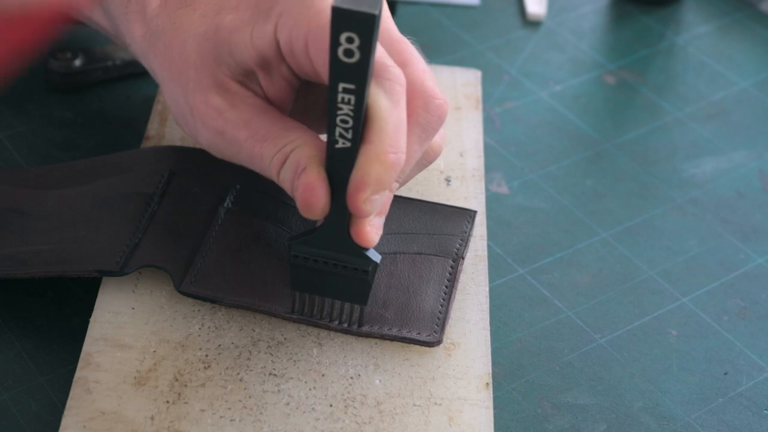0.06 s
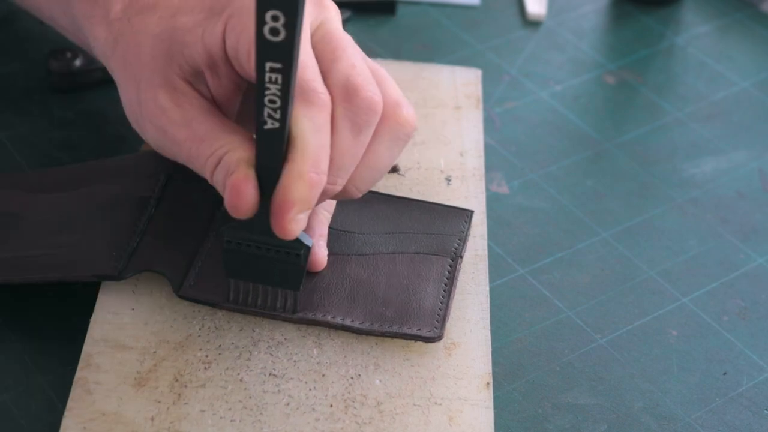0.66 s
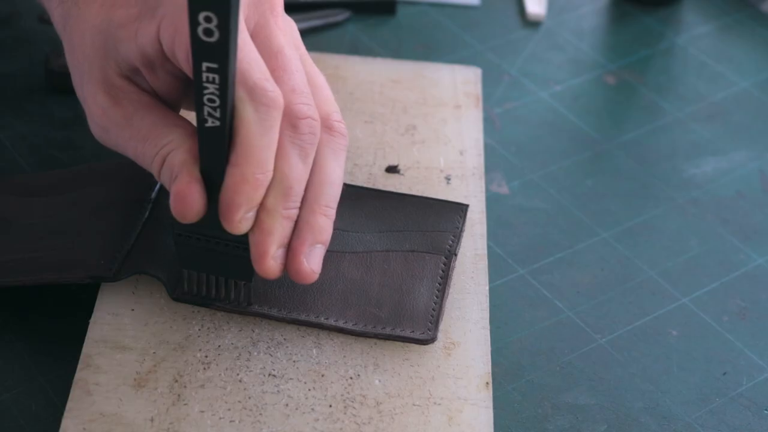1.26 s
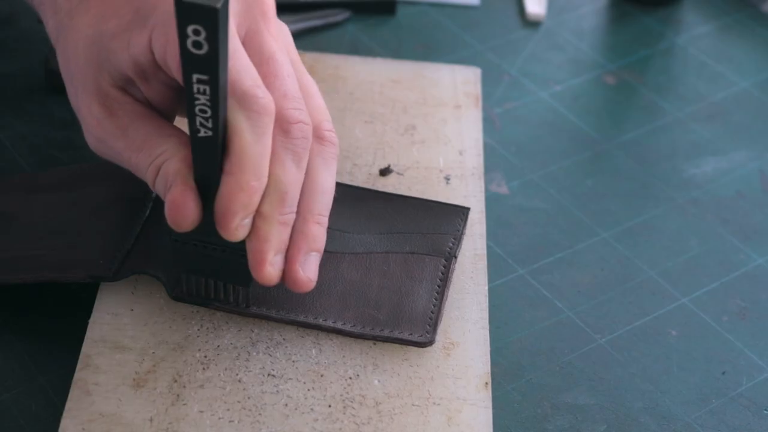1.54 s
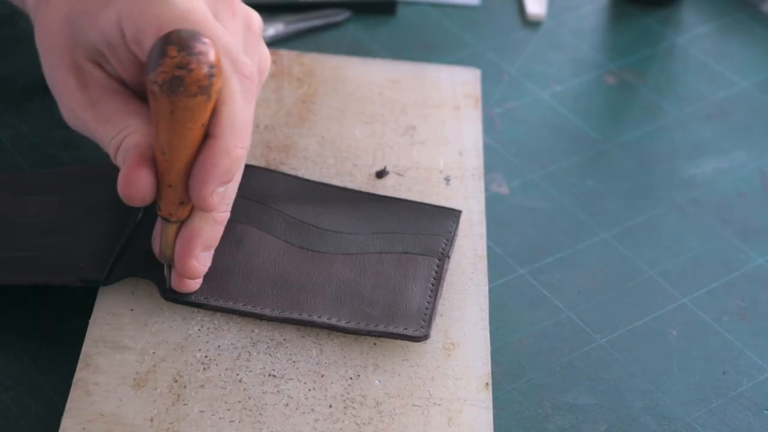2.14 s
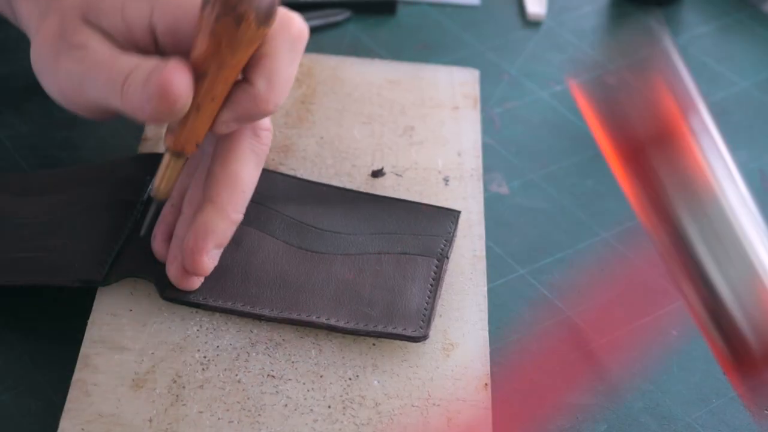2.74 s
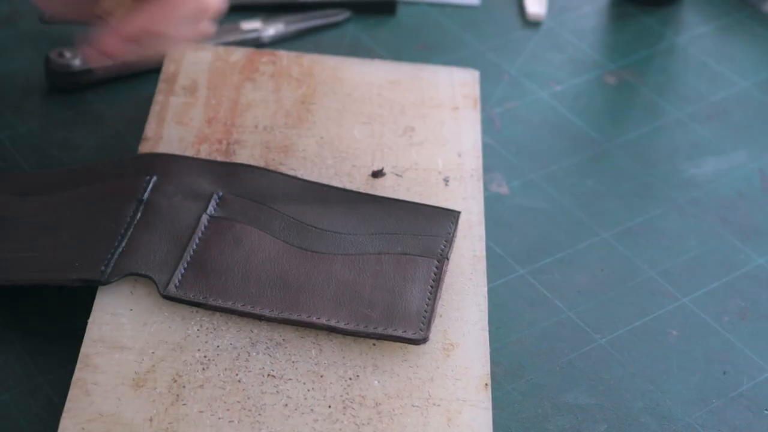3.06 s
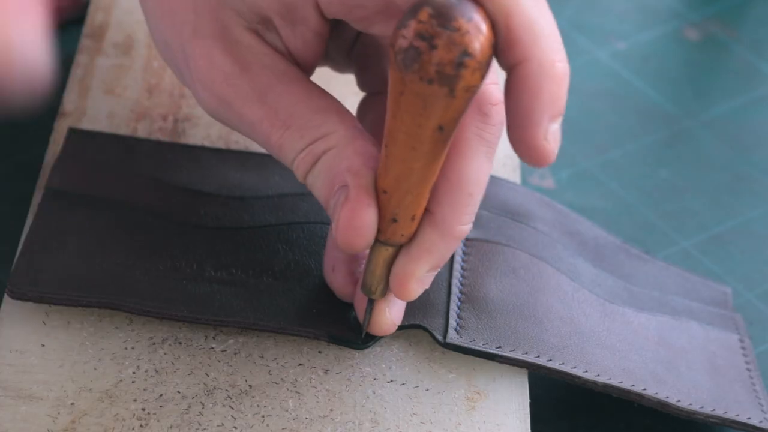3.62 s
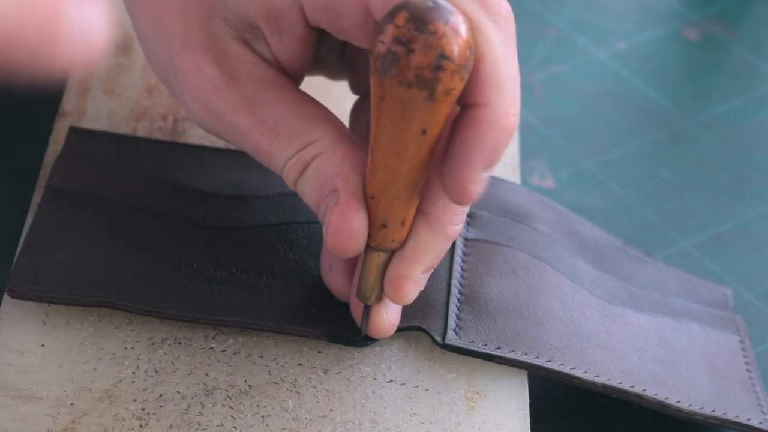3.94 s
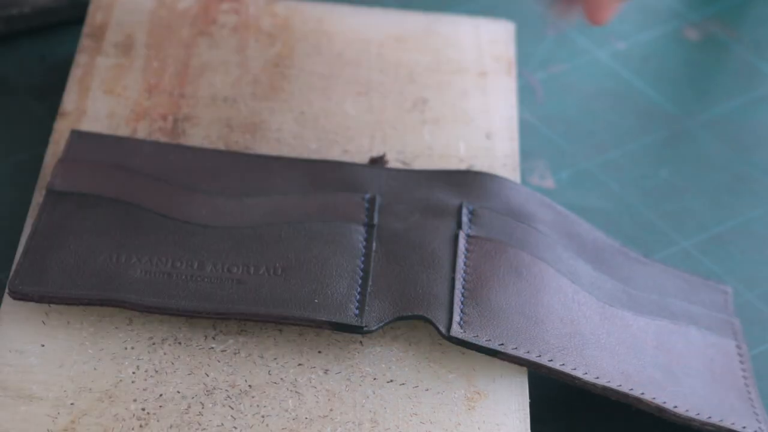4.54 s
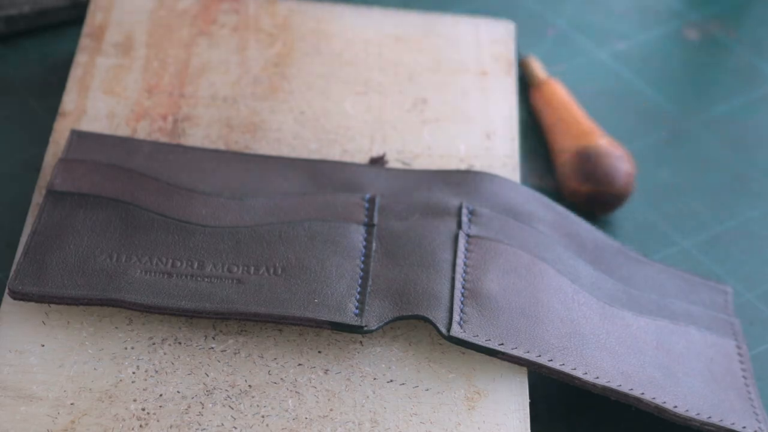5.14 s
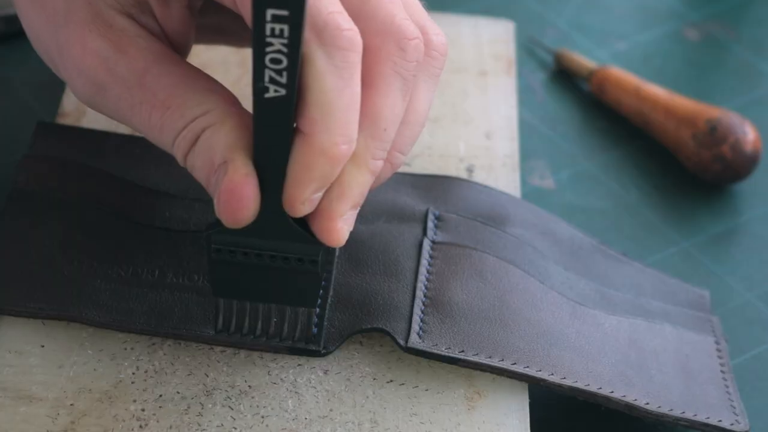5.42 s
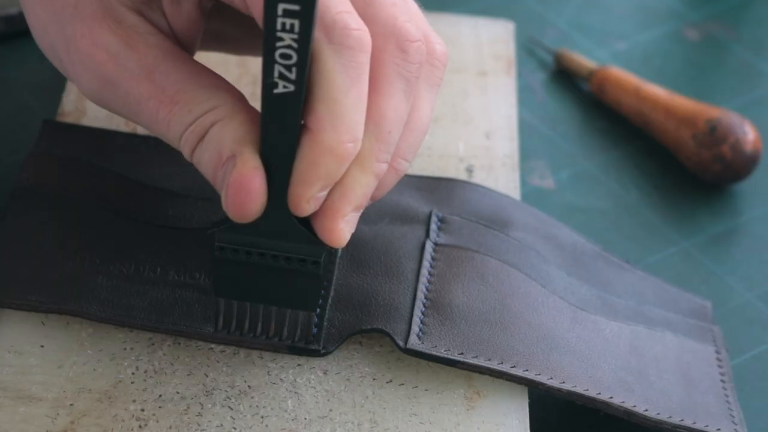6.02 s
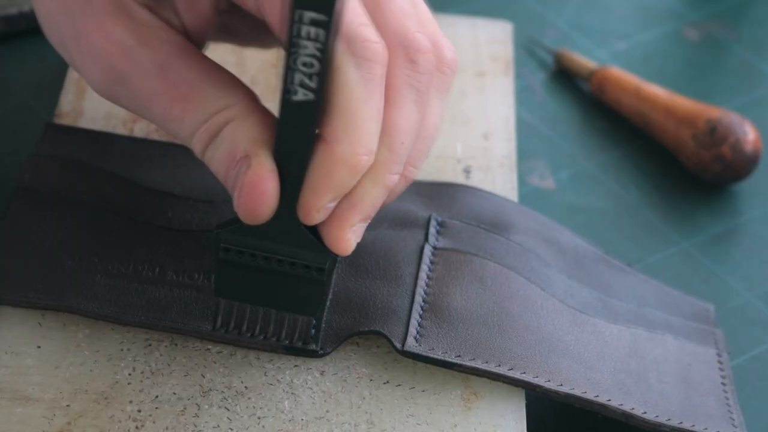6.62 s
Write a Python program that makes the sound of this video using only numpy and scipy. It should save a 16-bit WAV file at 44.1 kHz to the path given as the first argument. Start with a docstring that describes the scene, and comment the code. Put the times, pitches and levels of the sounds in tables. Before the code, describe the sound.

Close, hard mallet knocks on a stitching chisel and a wooden-handled awl, spaced by pauses and the lighter clatter of tools being put down.

```python
"""Sharp mallet blows on steel ring out in a small, lively workshop: a stitching chisel, then a
wooden-handled awl, is driven through a leather wallet into a cutting board. Between blows the mallet and
the awl are put down, the wallet slides and the next tool is seated, over quiet air and hum. Each contact
cracks, rings the tool and thumps the bench. The close microphone overloads on the heavy blows."""
import sys
import numpy as np
from scipy import signal
from scipy.fft import rfft, irfft
from scipy.io import wavfile

SR = 44100
rng = np.random.default_rng(int(sys.argv[2]) if len(sys.argv) > 2 else 0)


def digitize_waveform(pressure):
    """Quantize a signal to 16-bit integers and store it at the path in sys.argv[1].

    Rows of a 2-D input are taken as channels; values are limited to [-1, 1].
    """
    field = np.atleast_2d(pressure).T
    bounded = np.clip(field, -1, 1)
    quanta = np.round(bounded * 32767).astype(np.int16)
    wavfile.write(sys.argv[1], SR, quanta)


N = 303408
EDGE_HZ = 15800
KNOCK_SAMPLES = 32768  # one knock with its tail
T = np.arange(KNOCK_SAMPLES) / SR
HZ = np.fft.rfftfreq(KNOCK_SAMPLES, 1 / SR)


def amp(db):
    """Decibels to gain."""
    return 10 ** (np.asarray(db) / 20)


def unit(x):
    """Scales to an energy of one."""
    return x / np.sqrt(np.sum(x ** 2) + 1e-20)


def curve(points, hz):
    """An EQ curve through the points, on a log-frequency axis."""
    point_hz, db = np.transpose(points)
    return np.interp(np.log(hz + 1), np.log(point_hz + 1), db)


def decay(t, t60):
    """An envelope that falls 60 dB in t60 seconds."""
    return np.exp(-np.log(1000) * t / np.maximum(t60, 1e-3))


def add(mix, start_s, sound):
    """Lays a sound into the mix, trimming what falls outside."""
    start = round(start_s * SR)
    sound = sound[max(-start, 0):]
    part = mix[max(start, 0):][:len(sound)]
    part += sound[:len(part)]


def impulse(gain_db):
    """The sharpest click that has this spectrum (minimum phase)."""
    log_gain = np.log(amp(np.r_[gain_db, gain_db[-2:0:-1]]))
    return irfft(np.exp(np.conj(signal.hilbert(log_gain)))[:len(HZ)])


def through(x, response):
    """Passes a knock through an impulse response."""
    return signal.fftconvolve(x, response)[:KNOCK_SAMPLES]


def noise(colour):
    """Steady noise of rms one, shaped by an EQ curve."""
    hz = np.fft.rfftfreq(N, 1 / SR)
    spectrum = rfft(rng.standard_normal(N)) * amp(curve(colour, hz))
    return np.sqrt(N) * unit(irfft(spectrum, N))


def room_tone(air_db, waver):
    """Quiet air with a slightly wavering hum and a faint whine; the mids swell once."""
    # Colour of the room air: freq_hz, gain_db
    air_colour = [(20, -11), (45, -13.5), (75, -20), (110, -12.5), (160, -6.5), (260, -18.5), (600, -16.5),
                  (1100, -29), (1800, -27), (3000, -30.5), (7000, -35), (15500, -34.5), (17000, -61.5)]
    # Tones of the hum and whine: pitch_hz, level_db
    hum_tones = [(49.3, -54.5), (150.7, -64.5), (468, -74), (5179, -85.5)]
    t = np.arange(N) / SR
    swell_db = 8 * np.exp(-((t - 5.2) / .8) ** 2)  # crests at 5.2 s
    mids = noise([(200, -21.5), (450, -4.0), (1100, 2.5), (1700, -17), (4000, -30.5), (16000, -48)])
    out = amp(air_db) * noise(air_colour) + amp(-63.5 + swell_db) * mids
    for hz, db in hum_tones:
        drift = np.interp(t, np.linspace(0, t[-1], 30), rng.standard_normal(30))
        out += amp(db) * np.sqrt(2) * np.sin(2 * np.pi * hz * t + waver * np.sqrt(hz) * drift)
    return out


def room_reverb(wet_db, t60_s=0.38, absorbed_hz=10300):
    """Dull early echoes, standing waves and a diffuse tail whose treble is absorbed first."""
    # Colour of the diffuse tail: freq_hz, gain_db
    tail_colour = [(60, -11.5), (250, 2.5), (1000, -4.5), (3000, -7), (15000, -9.5)]
    # Early reflections: delay_s, gain
    echoes = [(.0031, 0.17), (.0052, -.15), (0.0122, .15), (0.0147, .18)]
    # Standing waves of the room: pitch_hz, gain_db, t60_s
    standing_waves = [(97.9, 7.5, 0.68), (125.5, 6, 0.51), (160, 9.5, 0.5), (226.2, 5.5, 0.42),
                      (275.3, -0.5, 0.58), (293, -4, .4), (400, -12, 0.27)]
    band_hz, t, bands = signal.stft(rng.standard_normal(KNOCK_SAMPLES), SR, nperseg=256)
    band_t60 = t60_s / np.hypot(1, band_hz / absorbed_hz)[:, None]
    bands = bands * decay(t, band_t60) * amp(curve(tail_colour, band_hz))[:, None]
    bands *= np.sqrt(2 * np.log(1000) / (t60_s * SR))  # keeps the energy independent of t60_s
    fade_in = 1 - np.exp(-(T / 0.011) ** 2)
    response = signal.istft(bands, SR, nperseg=256)[1][:KNOCK_SAMPLES] * fade_in
    for delay_s, gain in echoes:
        add(response, delay_s, gain * signal.windows.hann(11) / 5)
    for hz, db, t60 in standing_waves:
        envelope = decay(T, t60)
        response += amp(db) * 2 * envelope / envelope.sum() * np.cos(2 * np.pi * hz * T)
    return amp(wet_db) * response


def bench_thud():
    """Low modes of alternating polarity; each builds over its first cycle, so the bass arrives last."""
    # Resonances of the bench: pitch_hz, level_db, t60_s
    modes = [(52.5, -13.5, 0.048), (101.54, -14.5, 0.53), (138, -8.5, 0.061), (189.3, -9, 0.052)]
    thud = np.zeros(KNOCK_SAMPLES)
    for k, (hz, db, t60) in enumerate(modes):
        attack = 1 - np.exp(-2 * hz * T)
        thud += (-1) ** k * amp(db) * unit(np.sin(2 * np.pi * hz * T) * decay(T, t60) * attack)
    return thud


def timbre(crack, modes, ring_db):
    """Spectrum of a struck object in dB: a broad crack plus resonances, narrower the longer they ring."""
    power = unit(amp(curve(crack, HZ))) ** 2
    for hz, db, t60 in modes:
        width_hz = 2.2 / max(t60, 1e-3)
        peak = HZ / np.hypot(HZ ** 2 - hz ** 2, HZ * width_hz) / np.hypot(1, HZ / (2 * hz))
        power += (amp(db + ring_db) * unit(peak)) ** 2
    return 10 * np.log10(power)


def knocks(contacts, modes, crack, ring_db, rattle_db, rattle_t60, wet_db, clack_hz=3000):
    """Each contact cracks, rings and thumps the bench; loose things rattle and the room answers."""
    out = np.zeros(N)
    body_db, bench = timbre(crack, modes, ring_db), bench_thud()
    octaves = np.log2(np.clip(HZ, 200, EDGE_HZ) / clack_hz)
    clack_band = np.exp(-(octaves / 0.39) ** 2)  # the band that the way of hitting brings out
    for start_s, level_db, tilt, thud_db, clack_db in contacts:  # tilt: brightness in dB per octave
        strike = unit(impulse(body_db + tilt * octaves + clack_db * clack_band))
        blow = strike + amp(thud_db) * bench
        rattle = unit(through(strike, rng.standard_normal(KNOCK_SAMPLES) * decay(T, rattle_t60)))
        sound = blow + amp(rattle_db) * rattle + through(blow, room_reverb(wet_db))
        add(out, start_s, amp(level_db) * np.sqrt(SR / 100) * sound)  # level as if spread over 10 ms
    return out


def leather_slides():
    """Soft swells of friction as the wallet is shifted on the board."""
    # Moves of the wallet: start_s, length_s, level_db
    slides = [(1.3, 0.14, -55.5), (4.333, 0.11, -61.5), (5.045, 0.27, -55.5)]
    # Colour of rubbing leather: freq_hz, gain_db
    friction_colour = [(300, 3.5), (2500, -13), (4600, -6), (6500, -20), (15000, -27.5)]
    pressure = np.zeros(N)
    for start_s, length_s, db in slides:
        add(pressure, start_s, amp(db) * np.hanning(int(length_s * SR)))
    return pressure * noise(friction_colour)


def prong_ticks():
    """Steel prongs catch on the leather or pull free; the stronger the tick, the brighter."""
    # Ticks in the stitch holes: start_s, level_db, clack_db
    ticks = [(1.1927, -54, 22.5), (4.2056, -52, -0.5), (4.2122, -46.5, -1), (5.2207, -44.5, 0),
             (5.2367, -39.5, 1.5)]
    # Resonances of the prongs: pitch_hz, level_db, t60_s
    modes = [(3925, -0.5, .006), (6074, 0.5, .006)]
    # Colour of the tick's attack: freq_hz, gain_db
    crack = [(200, -11), (1500, -4), (3500, -1.5), (6000, -4), (8500, -10), (12000, 2), (16000, -18.5)]
    typical_db, typical_tilt, tilt_per_db, thud_db = -45.5, -4.5, 0.45, -13.5
    contacts = [(s, db, typical_tilt + tilt_per_db * (db - typical_db), thud_db, clack_db)
                for s, db, clack_db in ticks]
    return knocks(contacts, modes, crack, ring_db=-5.5, rattle_db=-0.5, rattle_t60=0.06,
                  wet_db=-7, clack_hz=2742)


def tool_seatings():
    """A tool bumps the board through the leather, then settles with a softer, duller bump."""
    # Tools set on the leather: start_s, level_db, tilt_db_per_octave, thud_db
    seatings = [(0.344, -37, -4.5, -2), (1.10, -43.5, -5.5, -6), (3.5235, -35, 2, 0.5),
                (5.2888, -20.5, 0.2, -6.5)]
    # Resonances of the cutting board: pitch_hz, level_db, t60_s
    modes = [(209, -2, 0.16), (275, -2, 0.14), (820, -13, 0.033), (990, -15, 0.034), (1976, -25, 0.015)]
    # Colour of the bump's attack: freq_hz, gain_db
    crack = [(60, 0), (250, 7), (500, -7.5), (1000, -0.5), (2000, -8), (4000, -19.5), (7000, -32.5),
             (15000, -34)]
    settle_s, clack_db = .0235, 4.5
    contacts = []
    for s, db, tilt, thud_db in seatings:
        contacts += [(s, db, tilt, thud_db, clack_db),
                     (s + settle_s, db - 6, tilt - 5, thud_db, 0)]
    return knocks(contacts, modes, crack, ring_db=3.5, rattle_db=-4.5, rattle_t60=0.015,
                  wet_db=-3, clack_hz=1450)


def awl_down():
    """The awl drops on the mat: its wooden handle rings with a hollow tap, then clicks as it rocks."""
    # The handle rocking to rest: start_s, level_db, tilt_db_per_octave
    rocks = [(4.7487, -16, 0.54), (4.7718, -35.5, 0), (4.8324, -26.5, 1.8)]
    # Resonances of the free handle: pitch_hz, level_db, t60_s
    modes = [(400, -10, .03), (680, -7, .04), (845, 0, .06), (1030, -6, .04), (1350, -4, .04),
             (2250, -9, .025), (5300, -11, .02)]
    # Colour of the tap's attack: freq_hz, gain_db
    crack = [(60, -27), (200, 0.5), (450, 9), (1000, 8.5), (3000, -1.5), (5500, -5), (7500, -14.5),
             (11000, -16.5), (15000, -34)]
    land_s, land_db, land_tilt, thud_db, clack_db = 4.7054, -18, 1.8, -18.5, -14.5
    tap = knocks([(land_s, land_db, land_tilt, thud_db, clack_db)], modes, crack,
                 ring_db=0.5, rattle_db=-2, rattle_t60=0.02, wet_db=0.5, clack_hz=5700)
    clicks = knocks([(s, db, tilt, thud_db, 0) for s, db, tilt in rocks], modes, crack,
                    ring_db=-11, rattle_db=1.0, rattle_t60=0.021, wet_db=1.5)
    return tap + clicks


def mallet_down():
    """The handle touches the mat first, the head follows and bounces once; the bench adds weight."""
    # Landings of the mallet: head_lands_s, head_db, handle_db, weight_db, flight_s, bounce_db
    landings = [(3.0505, -6.5, -22.5, -5.5, .0517, -19.5), (4.5593, -9, -15.5, 0.5, .0656, -30.5)]
    # Resonances of the mallet: pitch_hz, level_db, t60_s
    modes = [(253.5, 2.5, 0.02), (413, -9, 0.12), (603, -0.5, 0.032), (782, 7.5, 0.019), (870, -5.5, 0.036),
             (1030, 2, 0.022), (1090, -8.5, 0.021), (1950, -27.5, 0.026), (2680, -21, 0.013)]
    # Colour of the landing's attack: freq_hz, gain_db
    crack = [(60, -18), (300, 7), (1000, 5), (1500, -5), (3000, 1), (5500, -10.5), (8000, -24),
             (15000, -41)]
    handle_lead_s, land_tilt, bounce_tilt, thud_db = .0091, 0.6, 2.8, -19
    contacts = []
    for s, head_db, handle_db, weight_db, flight_s, bounce_db in landings:
        contacts += [(s - handle_lead_s, handle_db, land_tilt, thud_db, weight_db),
                     (s, head_db, land_tilt, thud_db, weight_db),
                     (s + flight_s, bounce_db, bounce_tilt, thud_db, weight_db)]
    return knocks(contacts, modes, crack, ring_db=-0.5, rattle_db=-3.5, rattle_t60=0.019,
                  wet_db=-3, clack_hz=240)


def awl_blows():
    """The mallet hits the awl's handle and falls back with a duller rebound; the board adds weight."""
    # Blows on the awl: start_s, level_db, tilt_db_per_octave, weight_db, rebound_drop_db
    blows = [(2.0296, -7, 1.65, 1, 12.5), (2.3750, -6, 0.27, 3, 12.5), (3.8779, -7, 1.97, -9, 5.5)]
    # Resonances of the struck awl: pitch_hz, level_db, t60_s
    modes = [(205, -8.5, 0.087), (248.2, -1, 0.019), (391, -6, 0.032), (498.3, -10, 0.035), (749, -9, 0.11),
             (892, -9, 0.038), (1160, -8.5, 0.017), (1790, -4, .011), (1970, -15, 0.044),
             (2940, -14, 0.024), (3200, -14, 0.053), (3830, -10.5, .012), (5080, -22, .04)]
    # Colour of the blow's attack: freq_hz, gain_db
    crack = [(60, -6.5), (300, -13), (600, 1.5), (1100, 3.5), (1800, -1.5), (2600, -4), (4000, -6),
             (7500, -19.5), (11500, -20.5), (15000, -32)]
    thud_db, rebound_s, rebound_thud_db = -7, .0108, 1
    contacts = []
    for s, db, tilt, weight_db, drop_db in blows:
        contacts += [(s, db, tilt, thud_db, weight_db),
                     (s + rebound_s, db - drop_db, tilt - 6, rebound_thud_db, weight_db)]
    return knocks(contacts, modes, crack, ring_db=1, rattle_db=-0.5, rattle_t60=0.017,
                  wet_db=-3, clack_hz=337)


def chisel_blows():
    """The mallet drives the chisel into the board: harder is brighter, and the grip tunes the clack."""
    # Blows on the chisel: start_s, level_db, clack_hz
    blows = [(-.135, 8.65, 2900), (0.6255, 7.8, 2800), (1.4017, 7.56, 2600), (5.7137, 5.2, 3450),
             (6.2406, 7.6, 2500), (6.6804, 5.4, 1650)]
    # Resonances of the struck chisel: pitch_hz, level_db, t60_s
    modes = [(166, -4, 0.032), (232, -8, 0.26), (283, -4.5, 0.023), (287, -4, 0.062), (380, -16.5, 0.22),
             (474, -8.5, 0.17), (548, -9.5, 0.19), (692.5, -9, 0.21), (798, -10, 0.15), (784, -7, 0.028),
             (840, -6.5, 0.042), (962, -4, 0.034), (1140, -15.5, 0.025), (1243, -6.5, 0.042),
             (1334, -10, 0.084), (1551, -4.5, 0.02), (1760, -13.5, 0.028), (2193, -15, 0.0056),
             (2600, -12.5, 0.079), (3026, -16, 0.05)]
    # Colour of the blow's attack: freq_hz, gain_db
    crack = [(60, -11), (250, 0.5), (800, 2), (1600, -4.5), (2700, -7.5), (4000, -16), (6000, -22),
             (8500, -32.5), (12000, -30), (15000, -44.5)]
    full_blow_db, thud_db = 7.5, -14
    out = np.zeros(N)
    for s, db, clack_hz in blows:
        force_db = db - full_blow_db
        tilt = 1.32 + 0.45 * force_db
        clack_db = 3.5 - 0.66 * force_db  # the clack stands out more on lighter blows
        out += knocks([(s, db, tilt, thud_db, clack_db)], modes, crack,
                      ring_db=-8.5, rattle_db=-1.5, rattle_t60=0.046, wet_db=-1, clack_hz=clack_hz)
    return out


def scene():
    """All the work at the bench, heard in mono from one close spot."""
    blows = chisel_blows() + awl_blows()
    handling = tool_seatings() + mallet_down() + awl_down() + prong_ticks() + leather_slides()
    return (blows + handling + room_tone(air_db=-57, waver=.04))[None]


def record(dry):
    """Heavy blows saturate at full scale with a tight knee; a steep low-pass trims the top."""
    clipped = dry / (1 + dry ** 8) ** (1 / 8)
    low_pass = signal.ellip(10, .1, 70, EDGE_HZ, fs=SR, output="sos")
    return signal.sosfilt(low_pass, clipped)


dry = scene()
out = record(dry)
digitize_waveform(out)
```